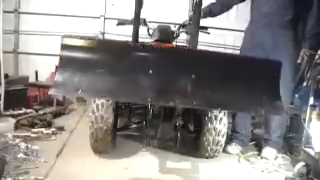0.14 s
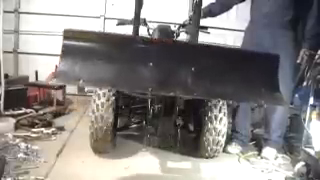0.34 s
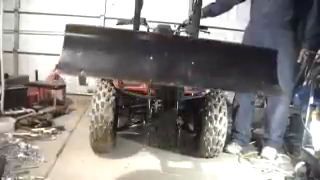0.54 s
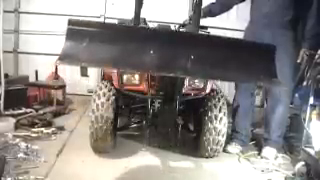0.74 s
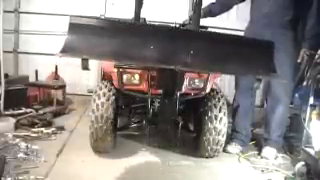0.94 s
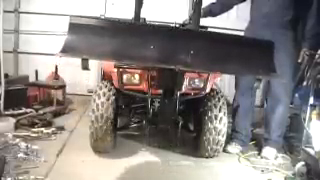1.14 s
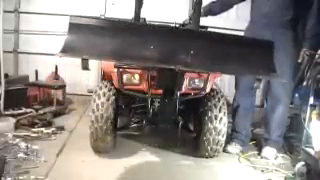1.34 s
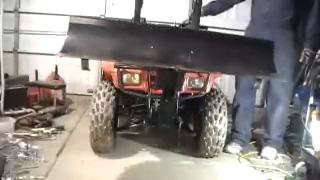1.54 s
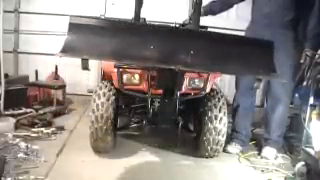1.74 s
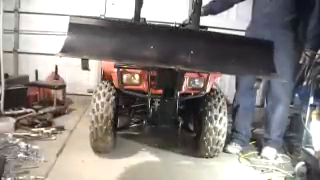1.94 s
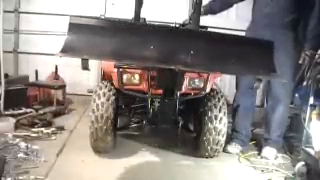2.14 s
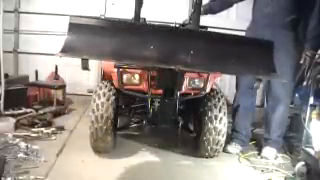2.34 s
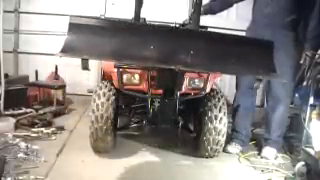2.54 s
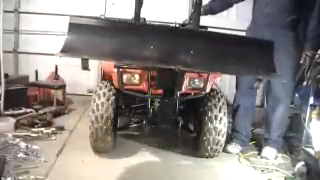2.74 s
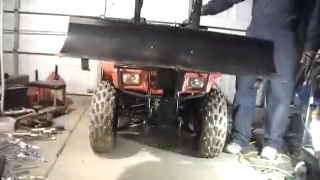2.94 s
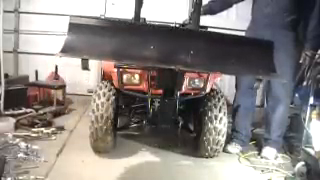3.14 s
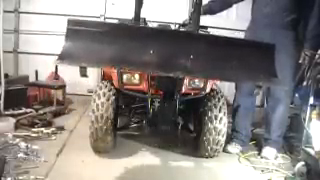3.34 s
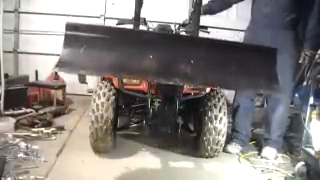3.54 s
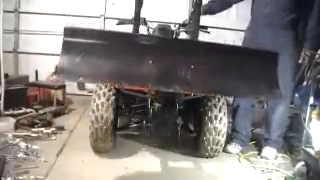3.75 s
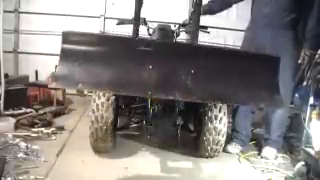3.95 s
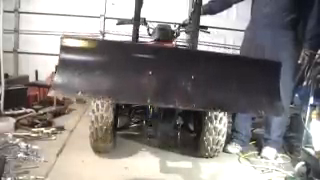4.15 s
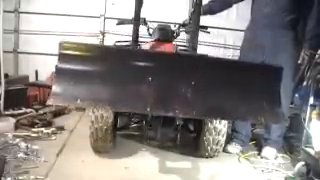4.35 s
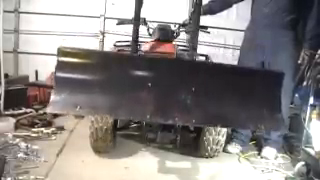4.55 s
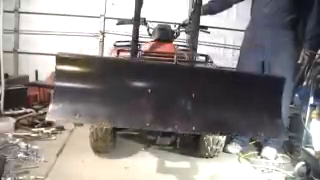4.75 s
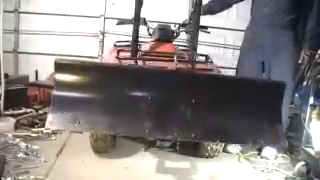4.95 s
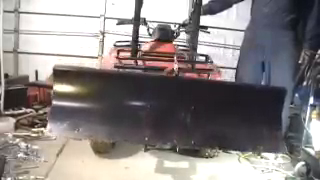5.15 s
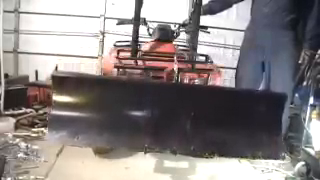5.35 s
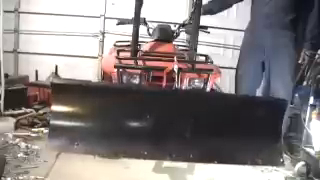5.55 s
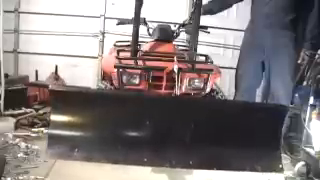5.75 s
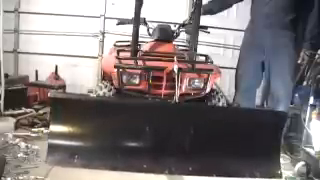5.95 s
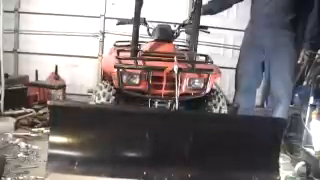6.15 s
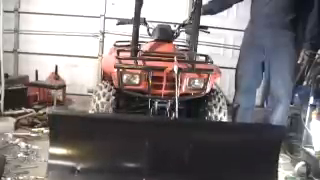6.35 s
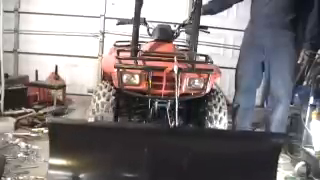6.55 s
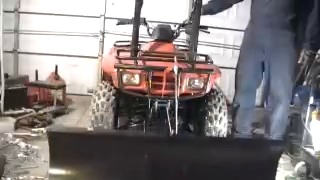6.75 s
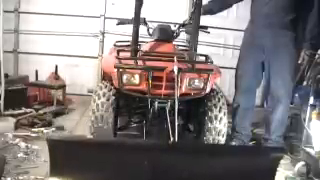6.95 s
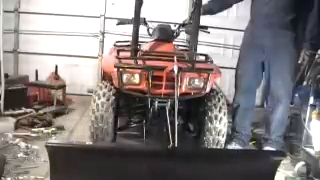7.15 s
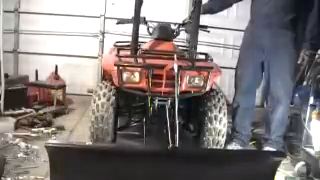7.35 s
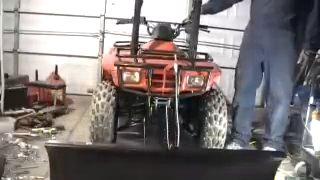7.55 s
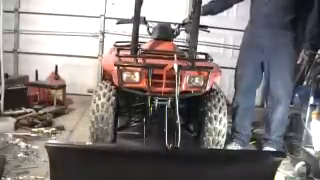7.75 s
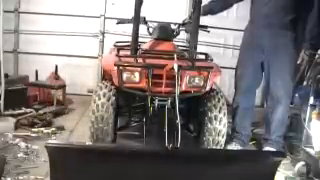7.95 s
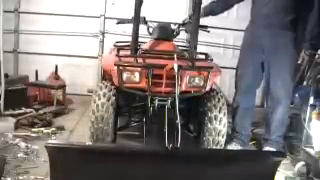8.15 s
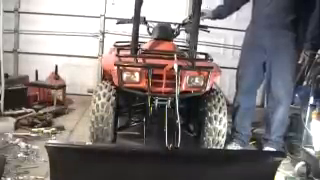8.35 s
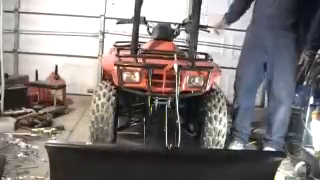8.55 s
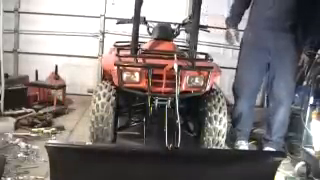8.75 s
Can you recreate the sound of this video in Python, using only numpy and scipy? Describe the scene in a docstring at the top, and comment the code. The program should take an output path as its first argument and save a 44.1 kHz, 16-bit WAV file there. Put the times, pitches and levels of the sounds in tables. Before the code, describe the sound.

From 0 s an electric winch is running close by: harsh, bright gear rattle pulsing about fifty times a second, over midrange frame rumble, with irregular hard knocks and a high whine. It stops just after 1 s and the hard garage rings for about half a second. Until 3.2 s only faint lamp buzz and hiss remain, with a soft cloth rustle and tiny tick near 1.8 s. At 3.2 s a sharp double relay clack restarts the winch, lighter at first, then fully grinding by about 4 s, slightly slower than before, swelling and dipping unevenly with scattered knocks. At 7.16 s the steel blade thuds on concrete, with short dull plate ringing and rapid bounces fading by 7.4 s. The motor grinds on until a bright snap at 7.75 s, coasts out, and the reverberation fades. Buzz and hiss creep back, with a brief clothing rustle near 8.7 s.

```python
"""Plough winch in a garage

An electric winch lifts a steel plough blade, rests, then lowers it to a concrete garage floor.
Gears grind and knock as impact noise that swells once a shaft turn, with whine and a ringing housing.
A relay clacks as short noise bursts; the blade thuds down as pressure pulses and decaying plate modes.
Lamps buzz as mains overtones under a faint hiss, clothing rustles, and the garage rings on after each stop.
"""
import sys
import numpy as np
from scipy import signal
from scipy.fft import rfft, irfft, next_fast_len
from scipy.io import wavfile
from scipy.ndimage import uniform_filter1d

SR = 44100
rng = np.random.default_rng(int(sys.argv[2]) if len(sys.argv) > 2 else 0)


def wav_record(signal):
    """Record a signal, one row per channel, as 16-bit PCM in the file named by sys.argv[1]."""
    frames = np.transpose(np.atleast_2d(signal))
    bounded = np.clip(frames, -1, 1)
    # unit amplitude maps onto the largest positive 16-bit level
    quanta = np.round(bounded * 32767).astype(np.int16)
    wavfile.write(sys.argv[1], SR, quanta)


N = 388521
T = np.arange(N) / SR
REVERSE_S = 2  # lifting before this time, lowering after it


def gain_of(db):
    """Level law: decibels to an amplitude ratio."""
    return 10 ** (np.asarray(db) / 20)


def evened(x):
    """Power normalisation: scales a signal to an rms of 1."""
    return x / np.sqrt(np.mean(x ** 2) + 1e-20)


def read(points, hz):
    """Spectral interpolation: reads a curve along a logarithmic frequency axis."""
    f, value = np.transpose(points)
    return np.interp(np.log(hz + 1), np.log(f + 1), value)


def add(mix, s, sound):
    """Superposition: adds a sound to the mix at time s."""
    part = mix[round(s * SR):][:len(sound)]
    part += sound[:len(part)]


def colour(x, db_at):
    """Zero-phase filtering: weights the spectrum by a level curve over frequency."""
    size = next_fast_len(x.shape[-1])
    weights = gain_of(db_at(np.fft.rfftfreq(size, 1 / SR)))
    return irfft(rfft(x, size) * weights, size)[..., :x.shape[-1]]


def octave_bell(f, hz, octaves, floor_db):
    """Band-pass weighting: 6 dB down at the given octaves from the centre, limited by a floor."""
    return np.maximum(-6 * (np.log2((f + 1) / hz) / octaves) ** 2, floor_db)


def slow_noise(shape, *sizes):
    """Random modulation: white noise smoothed by running means of the given lengths in samples."""
    noise = rng.standard_normal(shape)
    for size in sizes:
        noise = uniform_filter1d(noise, size=size)
    return evened(noise)


def burst(db, hz, t60, octaves, rise=0.0016):
    """Transient excitation: band noise with a quick linear rise and an exponential decay."""
    t = np.arange(round(.1 * SR)) / SR
    noise = colour(rng.standard_normal(len(t)), lambda f: octave_bell(f, hz, octaves, -48))
    return gain_of(db - 60 * t / t60) * evened(noise) * np.minimum(t / rise, 1) / 2


def chatter(per_s, spread_db):
    """Shot noise: loose impacts of uneven size at random instants, over steady hiss."""
    sizes = gain_of(spread_db * np.minimum(rng.exponential(1, N), 4))
    hits = sizes * (rng.random(N) < per_s / SR)
    return evened(hits * rng.standard_normal(N)) + 1.36 * rng.standard_normal(N)


# strong lamp overtones, the low ones leaning to one side:
# multiple [of mains frequency], level_db [dB], left_over_right_db [dB], phase_step_to_right [radians]
LAMP_OVERTONES = [(8, -63, 20, 1.9), (12, -76, 5, .4), (14, -68, -13, -1.7), (20, -73, -2, -.5),
                  (21, -71, 6, .7), (22, -79, 0, 0), (28, -75, 3, 1.6), (30, -76, 10, -1.9),
                  (40, -82, 3, 2.2), (42, -75, 6.5, 2.2), (48, -81, 0, 0), (50, -72.5, -1, -.2),
                  (52, -80, 2, -1.2), (54, -81, 0, 0), (68, -80, 0, 0), (70, -80, 0, 0), (72, -77, 0, 0),
                  (76, -78, 0, 0), (84, -80, 0, 0), (88, -81, 0, 0), (92, -78, 0, 0), (94, -81, 0, 0),
                  (96, -81, 0, 0), (98, -74, 0, 0), (100, -76, 0, 0), (102, -80, 0, 0), (106, -80, 0, 0),
                  (112, -79, 0, 0), (114, -81, 0, 0), (122, -81, 0, 0)]


def lamps():
    """Harmonic series: steady mains overtones, set as single spectral lines for each side."""
    mains_hz = 59.98
    size = next_fast_len(N)
    # faint even overtones; a strong one of the same multiple replaces its faint one
    faint = {k: (-87 + 2.5 * rng.standard_normal(), 0, 0) for k in np.arange(38, 138, 2)}
    rows = faint | {k: rest for k, *rest in LAMP_OVERTONES}
    db, left_db, step = np.transpose(list(rows.values()))
    right = gain_of(-left_db) * np.exp(1j * step)
    phase = np.exp(2j * np.pi * rng.random(len(db)))
    left = 2 * gain_of(db) * phase / abs(1 + right)  # the mean of both sides keeps the level
    bins = np.round(np.array(list(rows)) * mains_hz * size / SR).astype(int)
    lines = np.zeros((2, size // 2 + 1), complex)
    lines[:, bins] = left, left * right
    return irfft(lines, size)[:, :N] * size / np.sqrt(2)


# spectrum of the still-room hiss: pitch_hz [Hz], relative level_db [dB]
HISS_SPECTRUM = [(40, -21), (120, -1.5), (480, -7.5), (900, -3.5), (1500, -8), (2700, -13), (3600, -17),
                 (4600, -13), (6000, -17.5), (7200, -13.5), (8100, -15), (8900, -20), (12000, -22),
                 (13400, -36.5)]
# stereo width of the hiss: pitch_hz [Hz], side_over_middle_db [dB]
HISS_WIDTH = [(100, -6), (220, 0), (500, 4), (1500, 3), (3000, 4), (3800, 3.5), (4200, -15), (12000, -20.5)]


def room_hiss():
    """Diffuse field: independent middle and side noise, wide below the treble and centred above."""
    noise = colour(rng.standard_normal((2, N)), lambda f: read(HISS_SPECTRUM, f))
    middle, side = gain_of(-59) * evened(noise)
    side = colour(side, lambda f: read(HISS_WIDTH, f))
    return np.array([0.9 * (middle + side), 0.83 * (middle - side)])


# clothing rustles: centre_s [s], length_s [s], level_db [dB], pitch_hz [Hz], width_octaves [octaves]
CLOTH_RUSTLES = [(1.89, 0.87, -63.5, 6100, 1), (1.86, 0.34, -66, 8800, .04), (8.67, 0.2, -55.5, 1140, 1.04),
                 (8.66, 0.54, -60.5, 5500, 1.2)]


def rustles():
    """Friction noise: band-limited small impacts under a bell-shaped envelope."""
    out = np.zeros(N)
    for s, length, db, hz, octaves in CLOTH_RUSTLES:
        noise = colour(chatter(900, 1.5), lambda f: octave_bell(f, hz, octaves, -40))
        out += gain_of(db) * evened(noise) * np.exp(-((T - s) / length * 2) ** 2)
    return out


# reverberation time of the garage: pitch_hz [Hz], t60_s [s]
GARAGE_DECAY = [(200, 1), (500, 0.5), (2000, 0.47), (4000, 0.5), (6000, 0.44), (8000, 0.11), (12000, 0.087)]


def garage(x):
    """Reverberation: sparse taps of random sign, each band decaying at its own rate.

    Two patterns of reflections fade slowly in and out against each other, so no fixed room tone builds up.
    """
    lead = SR // 2
    taps = np.zeros((4, lead))
    at = np.arange(60, lead - 20, 20) + rng.integers(0, 20, (4, (lead - 61) // 20))
    np.put_along_axis(taps, at, rng.choice([-1., 1.], at.shape), 1)
    hz, t, bands = signal.stft(taps, SR, nperseg=256)
    early = gain_of(-3.5 - 60 * t / 0.11)  # vehicle, floor and door close by
    late = gain_of(-60 * t / read(GARAGE_DECAY, hz)[:, None])
    tail = signal.istft(bands * (late + early), SR, nperseg=256)[1]
    tail = tail / np.linalg.norm(tail, axis=1, keepdims=True)
    longer = np.concatenate([x[lead:0:-1], x])  # mirrored lead-in: the room already rings at the start
    fade = 2 * np.pi * 1.3 * np.arange(len(longer)) / SR
    fed = longer * np.array([np.sin(fade), np.sin(fade), np.cos(fade), np.cos(fade)])
    wet = signal.fftconvolve(fed, tail, axes=1)[:, lead:lead + N]
    return wet[:2] + wet[2:]


# relay and handlebar switch: start_s [s], level_db [dB], pitch_hz [Hz], t60_s [s], width_octaves [octaves]
SWITCH_CLACKS = [(1.832, -40.5, 2250, 0.033, 0.49), (3.202, -34, 2350, 0.25, 2.8),
                 (3.2133, -10.5, 3980, 0.082, 2.2), (3.216, -7, 6100, 0.034, 0.95),
                 (3.2234, 1, 6560, 0.026, 1.6), (7.749, -0.5, 10000, 0.049, 0.7)]


def clacks():
    """Contact impact: short, mostly bright noise snaps of relay and switch."""
    out = np.zeros(N)
    for s, db, hz, t60, octaves in SWITCH_CLACKS:
        add(out, s, burst(db, hz, t60, octaves, rise=0.0015))
    return out


# blade edge meeting the floor and bouncing: start_s [s], level_db [dB]
FLOOR_CONTACTS = [(7.1629, -2.5), (7.177, -13), (7.19, -11), (7.2142, -4), (7.2215, -8), (7.238, -14),
                  (7.268, -11), (7.277, -9), (7.299, -13), (7.323, -14), (7.338, -17), (7.362, -19),
                  (7.4, -24)]
# plate modes of the blade: pitch_hz [Hz], relative level_db [dB], t60_s [s]
PLATE_MODES = [(255.6, 7, 0.15), (347, 0.5, 0.27), (479, 4.5, 0.24), (597, -8, 0.34), (682, -4, 0.36),
               (885, 0, 0.25), (1080, -7, 0.17), (1690, -1, 0.16), (2065, -10, .12)]


def blade():
    """Impact radiation: each contact pushes air, shakes the frame and rings the plate modes."""
    out, t = np.zeros(N), np.arange(round(.4 * SR)) / SR
    blow_s = .00058
    u = t / blow_s - 1.2
    push = -np.sqrt(2 * np.e) * u * np.exp(-u ** 2)
    for s, db in FLOOR_CONTACTS:
        ring = 0
        for hz, mode_db, t60 in PLATE_MODES:
            ring = ring + gain_of(mode_db - 60 * t / t60) * np.sin(2 * np.pi * (hz * t + rng.random()))
        add(out, s, gain_of(db) * (push + gain_of(-20) * ring * np.minimum(t / 0.0092, 1)))
        add(out, s, burst(-13 + 0.33 * db, 1400, 0.2, 0.85))  # frame shake follows the blow by a share of its dB
    thin_sheet = signal.butter(4, 225, "high", fs=SR, output="sos")  # a thin sheet gives little bass
    return signal.sosfilt(thin_sheet, out)


# motor shaft, faster winding in than paying out: time_s [s], turns_so_far [turns]
SHAFT_TURNS = [(0, -.14), (1.2, 61.68), (3.22, 61.96), (3.67, 80.17), (4.42, 110.56), (5.02, 135.07),
               (6.07, 177.99), (6.97, 214.88), (7.27, 227.12), (8, 256.62)]


def shaft_turns():
    """Kinematics: the shaft angle in turns, interpolated over time."""
    return np.interp(T, *np.transpose(SHAFT_TURNS))


# one list a run of the winch: time_s [s], rattle level_db [dB], rumble_over_rattle_db [dB], before trims
RUN_LEVELS = [
    [(0.0, -17, -7.5), (0.42, -17, -5), (0.48, -21, -8), (0.56, -19, -6.5), (0.64, -17.5, -8.5),
     (0.75, -19, -4), (0.85, -17, -8), (0.982, -15, -6.5), (1.07, -31.5, -0.5)],
    [(3.23, -26.5, -1), (3.26, -30.5, -5), (3.6, -22.5, -3), (4.27, -17.5, -4), (4.32, -24, -0.5),
     (4.41, -17.5, -4.5), (4.66, -20.5, -3), (4.76, -17, -5), (4.87, -21.5, -1), (4.96, -17, -5),
     (5.25, -16.5, -3.5), (5.33, -20.5, -2.5), (5.38, -16, -5), (5.55, -19.5, -2.5), (5.64, -21, -1.5),
     (5.72, -16.5, -4.5), (5.9, -19, -3.5), (6.08, -17, -4.5), (6.28, -23.5, -4.5), (6.38, -18.5, -6),
     (6.62, -17.5, -4.5), (6.7, -16.5, -8), (6.8, -19.5, -2.5), (7.06, -16, -6.5), (7.13, -17, -5.5),
     (7.22, -27, 1.5), (7.38, -18.5, -7), (7.6, -17.5, -9), (7.72, -15, -6.5), (7.79, -24.5, 3.5),
     (7.84, -34.5, 0)],
]
# slower gears with a tight spot: shaft_turns_per_gear_turn [turns], rattle_swell_db [dB],
# rumble_swell_db [dB], tight_pass_lifting [shaft turn], tight_pass_lowering [shaft turn]
TIGHT_GEARS = [(3.483, 1.5, 0, 30, 151.1), (12.7, 0, 0.1, 40, 152.0), (21, 0.07, 1.17, 51, 156)]


def gear_levels(turns):
    """Amplitude modulation: rattle and rumble follow drawn level curves and swell once a turn of each slow gear."""
    rattle_db, rumble_db = np.full(N, -120.), np.full(N, -120.)
    for rows in RUN_LEVELS:
        end, last_db, last_rel = rows[-1]
        coasting = (end + 0.2, last_db - 46, last_rel + 8)  # the rattle dies first
        s, db, rel = np.transpose([*rows, coasting])
        on = (T >= s[0]) & (T < s[-1])
        rattle_db[on] = np.interp(T[on], s, db)
        rumble_db[on] = rattle_db[on] + np.interp(T[on], s, rel)
    for ratio, high_db, low_db, up, down in TIGHT_GEARS:
        tight = np.cos(2 * np.pi * (turns - np.where(T < REVERSE_S, up, down)) / ratio)
        rattle_db, rumble_db = rattle_db + high_db * tight, rumble_db + low_db * tight
    return rattle_db, rumble_db


# filter on the gear rattle: pitch_hz [Hz], relative level_db [dB]
RATTLE_SPECTRUM = [(1180, -28.5), (2000, 0), (2610, -2.5), (4020, -4), (5540, -4), (6180, -4), (7810, -4),
                   (9280, -8.5), (11900, -12.5), (12600, -27), (13000, -56)]
# filter on the frame rumble: pitch_hz [Hz], relative level_db [dB]
RUMBLE_SPECTRUM = [(24, -90.5), (40, -78), (125, -48), (160, -32), (197, -24), (269, -8), (348, -8.5),
                   (467, -1), (637, -4), (1080, -2.5), (2180, 2), (2570, -3.5), (3200, -5.5), (4160, -33.5),
                   (7040, -120)]


def gear_noise(turns, rattle_db, rumble_db):
    """Cyclic impact noise: tooth chatter swells once a shaft turn, as bright rattle and frame rumble."""
    blows = gain_of(4 * np.minimum(rng.standard_normal((300, 4)), 1.5))
    blows = blows[np.floor(turns).astype(int) + 1]  # each turn strikes unevenly by band
    swell = np.exp(-(turns % 1) / 0.26) * np.minimum(turns % 1 / 0.14, 1)
    rattle = 0
    for blow, hz in zip(blows.T, (3810, 5240, 7520, 11560)):
        band = chatter(2500, 0.83) * (1 + 1.07 * blow * swell)
        rattle = rattle + colour(band, lambda f: octave_bell(f, hz, 0.34, -60))
    rattle = evened(colour(rattle, lambda f: read(RATTLE_SPECTRUM, f)))
    rumble = chatter(1500, 2.5) * (1 + 0.65 * swell)
    rumble = evened(colour(rumble, lambda f: read(RUMBLE_SPECTRUM, f)))
    return rattle * gain_of(rattle_db - 2.0) + rumble * gain_of(rumble_db - 1.5)


# the hardest gear knocks: start_s [s], level_db [dB, before trims], pitch_hz [Hz]
GEAR_KNOCKS = [(0.0564, -5, 6000), (0.0807, -6.5, 6120), (0.1376, -2.5, 7570), (0.16, 2.5, 6300),
               (0.2354, -7, 6080), (0.2917, -5.5, 4310), (0.3514, -4.5, 7540), (0.3714, 0, 7530),
               (0.4094, -15, 5100), (0.429, 0.5, 6120), (0.5452, -5, 5760), (0.5643, 2, 6080),
               (0.6018, -5, 4670), (0.622, 1.5, 4450), (0.6434, 2, 6160), (0.7003, 1.5, 6140),
               (0.7584, -6.5, 6730), (0.8348, -1, 6730), (0.8955, 0.5, 6270), (0.9547, -7.5, 4440),
               (0.9743, 4, 4310), (3.3188, -12.5, 8000), (3.3452, -13, 8000), (3.3707, -13.5, 6100),
               (3.3931, -13, 6000), (3.4934, -14, 8000), (3.5184, -26, 7990), (3.5444, -8, 4440),
               (3.59, -4, 6730), (3.641, -1.5, 4450), (3.666, -4, 7200), (3.7374, -2.5, 8000),
               (3.8154, -8.5, 6480), (3.889, -5.5, 4450), (3.9634, -2, 5190), (3.989, -13, 5150),
               (4.0377, -4, 6120), (4.0866, -3.5, 6080), (4.1076, 1, 6550), (4.1619, -5, 8150),
               (4.182, 2.5, 6080), (4.2344, -11, 3670), (4.3325, -3, 6000), (4.4075, -4, 4100),
               (4.5774, -11, 6000), (4.6004, -4, 6100), (4.6274, -5, 7250), (4.6994, -8.5, 3750),
               (4.7225, -11.5, 7490), (4.751, -2, 5980), (4.773, -3, 3600), (4.8473, -18, 5000),
               (4.945, -7.5, 4910), (4.9933, -2.5, 5980), (5.093, -3, 5980), (5.1387, -2, 7080),
               (5.1894, -19.5, 6100), (5.215, -2.5, 6120), (5.2648, -12.5, 5990), (5.3108, -0.5, 4550),
               (5.3612, 3, 6560), (5.435, -15, 6110), (5.5078, -14, 6000), (5.5584, 0, 7970),
               (5.581, -2, 6070), (5.7055, -2.5, 7200), (5.728, -2, 7740), (5.8264, -1, 8040),
               (5.899, -7, 7050), (5.949, -13, 6560), (5.9964, -10, 4090), (6.0202, -2.5, 3960),
               (6.045, 0.5, 6080), (6.141, 0.5, 7900), (6.2177, -2.5, 6000), (6.288, -13, 6000),
               (6.3354, -3, 6000), (6.3614, -3.5, 4530), (6.3889, 3, 8000), (6.4617, -0.5, 5100),
               (6.5819, -9.5, 5150), (6.6568, -1, 6060), (6.678, 2, 5400), (6.7293, 2, 6530),
               (6.751, 4.5, 6760), (6.8034, -9, 6000), (6.9717, 3, 4340), (7.0434, 3, 4290),
               (7.1915, -3, 7000), (7.3187, -9, 6000), (7.3677, -2.5, 4470), (7.414, -4, 7040),
               (7.4634, -3.5, 3510), (7.4864, -1, 3260), (7.5627, -1.5, 6670), (7.5857, -2, 5480),
               (7.6123, 1, 4080), (7.6614, -6, 4150), (7.686, -2, 6550), (7.7114, -2, 6000),
               (7.7372, -2, 8050)]


def gear_knocks():
    """Impact excitation: each knock is a broad blow, a narrow ring and the answer of the frame."""
    out = np.zeros(N)
    for s, db, hz in GEAR_KNOCKS:
        add(out, s, burst(db - 9, hz, 0.056, 0.9) + burst(db - 10.5, hz, 0.057, 0.14))
        add(out, s, burst(db - 17, 1700, 0.08, 0.68))  # the frame takes it up
    return out


# gear housing resonances: pitch_hz [Hz], width_hz [Hz], boost_db [dB above the broad spectrum]
HOUSING_MODES = [(1062, 20, 6), (468, 40, 1), (1240, 60, 2), (2085, 30, 3), (3670, 120, 2), (4080, 170, 3),
                 (4600, 80, 2), (5170, 150, 3), (6100, 180, 5), (6560, 50, 4), (7240, 40, 5), (7570, 90, 2),
                 (7990, 60, 4)]


def housing(x):
    """Minimum-phase resonance: one causal filter whose phase follows from its level curve."""
    hz = abs(np.fft.fftfreq(8192, 1 / SR))
    level_db = sum(db / (1 + (2 * (hz - f) / width) ** 2) for f, width, db in HOUSING_MODES)
    log_gain = np.log(gain_of(level_db))
    taps = np.fft.ifft(np.exp(np.conj(signal.hilbert(log_gain)))).real[:2048]
    return signal.oaconvolve(x, taps)[:N]


# frame and drum modes: pitch_hz [Hz], width_hz [Hz], lifting_db and lowering_db [dB over the rumble curve]
FRAME_MODES = [(87, 18, -33, -55), (162.4, 18, -38, -44), (245.4, 16, -31, -34), (440, 14, -26, -22),
               (474, 18, -24, -18), (1064, 20, -30, -22), (2020, 20, -20, -23), (2088, 22, -19, -19),
               (4070, 30, -21, -19), (4460, 25, -22, -21), (4914, 40, -22, -20), (5160, 40, -21, -20),
               (5985, 35, -16, -18), (6120, 27, -19, -17), (6325, 30, -19, -19), (7238, 30, -21, -19),
               (7990, 50, -21, -20)]


def frame_modes(modes_db):
    """Random modal excitation: narrow bands of noise drifting slowly in level, silent when the motor coasts."""
    out = np.zeros(N)
    for hz, width, up_db, down_db in FRAME_MODES:
        noise = rng.standard_normal(N)
        hum = evened(colour(noise, lambda f: np.maximum(-6 * ((f - hz) / width * 2) ** 2, -60)))
        drift_db = 4 * np.minimum(slow_noise(N, 4000, 3000), .7)
        out += gain_of(modes_db + drift_db + np.where(T < REVERSE_S, up_db, down_db)) * hum
    return out


# shaft orders heard while lowering: multiple [of shaft rate], level_db [dB over the rumble curve]
LOWERING_ORDERS = [(4, -33), (6, -30)]


def shaft_orders(turns, modes_db):
    """Order tones: sines locked to multiples of the shaft angle, wavering in level and phase."""
    out = np.zeros(N)
    for k, db in LOWERING_ORDERS:
        waver = slow_noise((2, N), 3000, 2000)
        tone = np.sin(2 * np.pi * k * turns + 1.6 * waver[1]) * (T > REVERSE_S)
        out += gain_of(modes_db + db + 7.7 * np.minimum(waver[0], 1)) * tone
    return out


# whine at the first two multiples of the mesh rate: time_s [s], first level_db [dB], second level_db [dB]
WHINE_LEVELS = [(0, -30.5, -41), (.3, -33, -41), (.45, -36.5, -53.5), (.6, -43.5, -42), (.8, -33.5, -43),
                (.98, -45.5, -37), (1.1, -77, -75.5), (3.3, -49.5, -56), (3.6, -42.5, -32.5),
                (4.4, -40, -36), (5, -42.5, -31), (5.7, -35, -38), (5.9, -53, -44), (6.1, -44, -42.5),
                (6.6, -59, -42), (7.75, -54, -38.5), (7.88, -68.5, -68.5)]


def gear_whine(turns, running):
    """Gear meshing: tones at multiples of the tooth contact rate, with uneven phase and level."""
    mesh = 27.4  # tooth contacts a shaft turn
    out = np.zeros(N)
    s, *levels = np.transpose(WHINE_LEVELS)
    for k, db in enumerate(levels, 1):
        wander = slow_noise((2, N), 2500)  # teeth meet a little unevenly
        tone = np.sin(2 * np.pi * k * mesh * turns + 0.45 * wander[0]) * running
        flicker_db = (2.8 - 0.8 * k) * wander[1]
        out += np.sqrt(2) * gain_of(np.interp(T, s, db) + flicker_db) * tone
    return out


def winch():
    """Source and filter: gear noise and knocks excite the housing, joined by modes, orders and whine."""
    turns = shaft_turns()
    rattle_db, rumble_db = gear_levels(turns)
    body = housing(gear_noise(turns, rattle_db, rumble_db) + gear_knocks())
    driven_db = -26  # below this rattle level the motor only coasts and the modes fall silent
    modes_db = rumble_db + 3 * np.minimum(rattle_db - driven_db, 0)
    body += frame_modes(modes_db) + shaft_orders(turns, modes_db)
    return body + gear_whine(turns, rattle_db > -99)


# room level, one list for lifting and one for lowering: pitch_hz [Hz], level_db [dB]
ROOM_LEVELS = [
    [(125, -10), (250, -4.5), (500, -1), (1000, 0), (2500, -3), (6000, -4), (12000, -2.5)],
    [(125, -11), (250, -5.5), (500, -1.5), (1000, -1), (2500, -2.5), (5000, -2), (8000, -.5), (12000, 0)],
]
# stereo balance of winch, blade and room: pitch_hz [Hz], left_over_right_db [dB]
SIDE_BALANCE = [(150, -2.5), (300, 3), (1000, 2), (2200, 1), (6000, -0.5), (12000, 1)]


def scene():
    """Superposition: direct sound near the middle, its reverberation and the quiet background."""
    background = room_hiss() + lamps() + rustles()
    motor, steel = winch() + clacks(), blade()
    room = garage(motor + gain_of(-2.0) * steel)  # the blade faces forward and stirs the room less
    lifting, lowering = [colour(room, lambda f: read(levels, f)) for levels in ROOM_LEVELS]
    heard = gain_of(3.5) * (motor + steel) + np.where(T < REVERSE_S, lifting, lowering)
    halves = np.array([[.5], [-.5]])  # each side takes half of the balance
    return colour(heard, lambda f: halves * read(SIDE_BALANCE, f)) + background


def record(dry):
    """Dynamic compression: fast and slow gain control, then soft saturation, bass roll-off and band limit."""
    power_db = 10 * np.log10(abs(uniform_filter1d((dry ** 2).mean(0), size=300)) + 1e-12)
    fall = T * 39.0  # the fast detector falls at 39 dB a second
    over_db = np.maximum(np.maximum.accumulate(power_db + fall) - fall + 13.5, 0)
    # a slow stage of 0.4 s lets the background creep back after a run
    keep = np.exp(-1 / (.4 * SR))
    loud_db = np.clip(power_db + 25.5, 0, 12)
    slow_db = signal.lfilter([1 - keep], [1, -keep], loud_db - loud_db[0]) + loud_db[0]
    cut_db = 0.15 * uniform_filter1d(over_db, size=100) + 0.39 * slow_db - 0.47
    ducked = dry / gain_of(cut_db)
    ducked = .95 * np.tanh(ducked / .95)  # the converter saturates softly
    ducked = signal.sosfilt(signal.butter(3, 130, "high", fs=SR, output="sos"), ducked)
    band_limit = signal.firwin(511, 12700, window=("kaiser", 9), fs=SR)
    return signal.oaconvolve(ducked, band_limit[None], "same")


dry = scene()
out = record(dry)
wav_record(out)
```